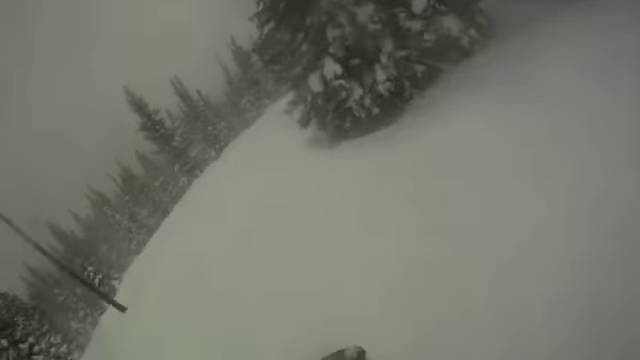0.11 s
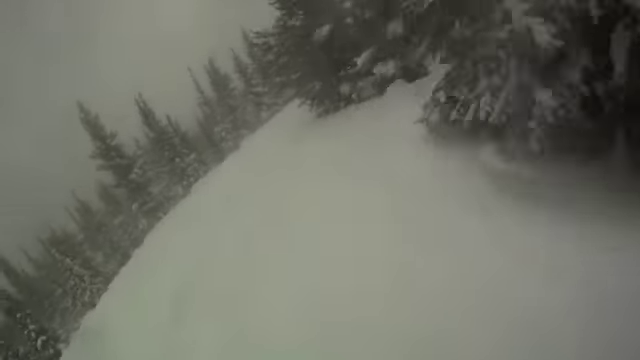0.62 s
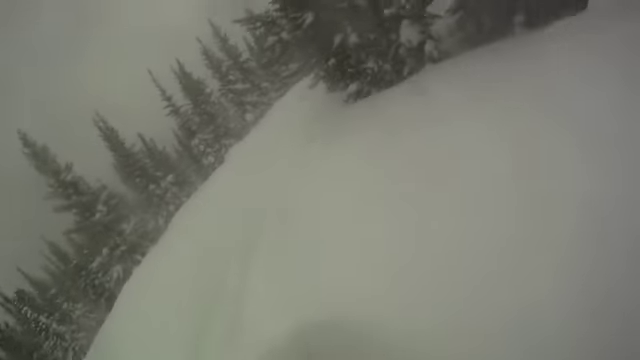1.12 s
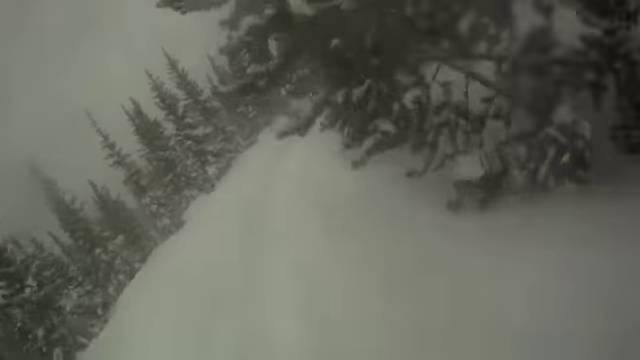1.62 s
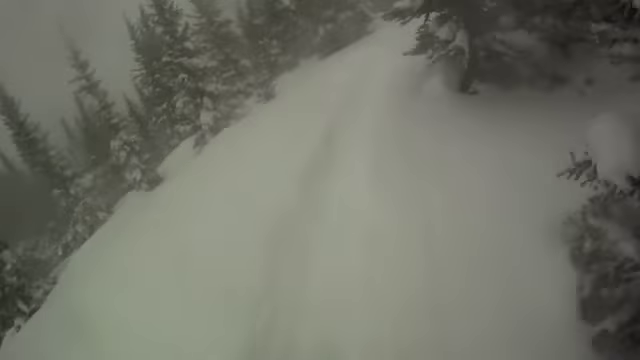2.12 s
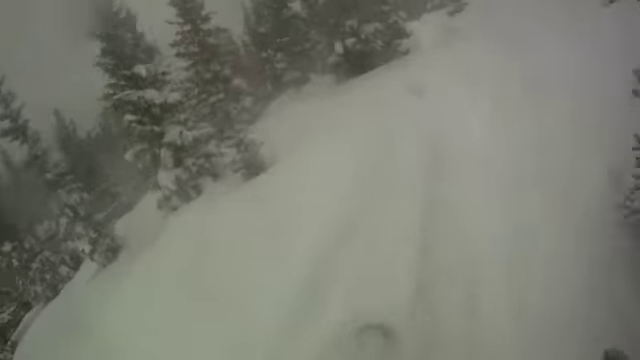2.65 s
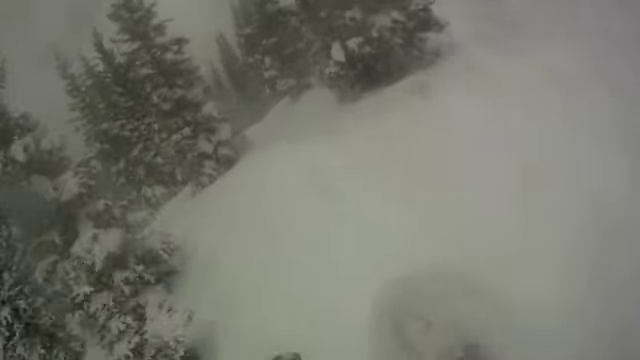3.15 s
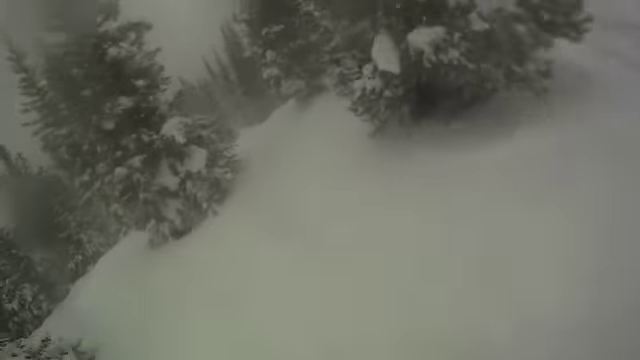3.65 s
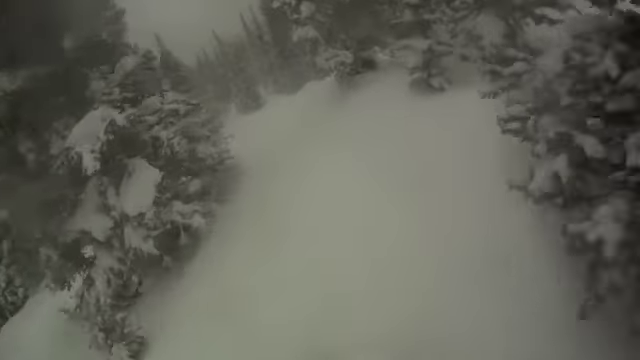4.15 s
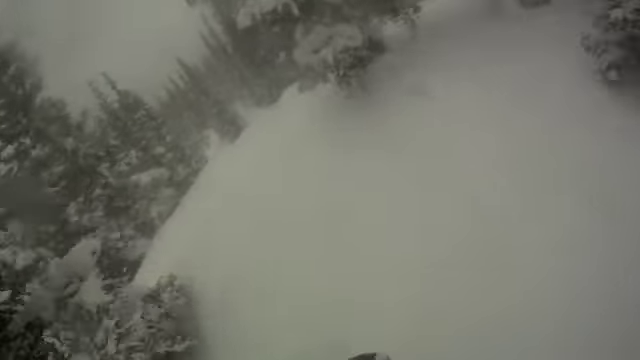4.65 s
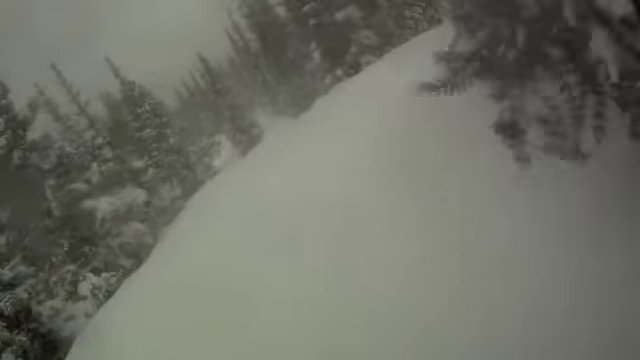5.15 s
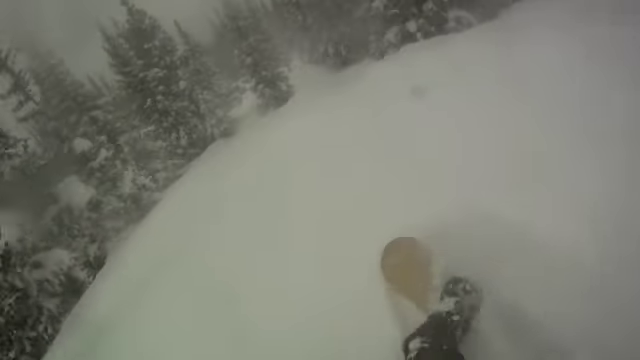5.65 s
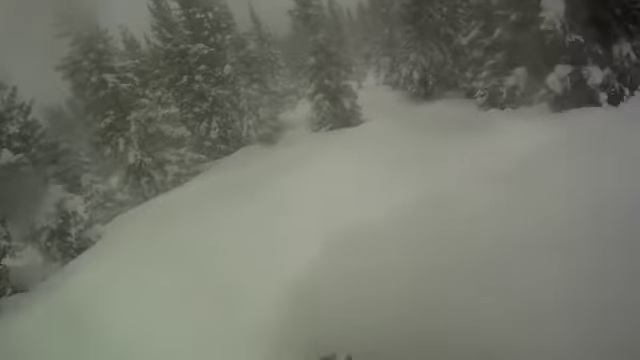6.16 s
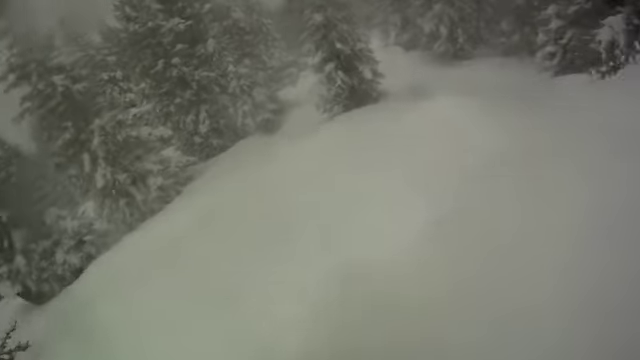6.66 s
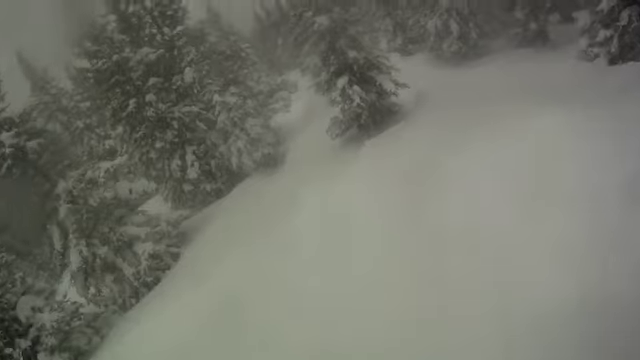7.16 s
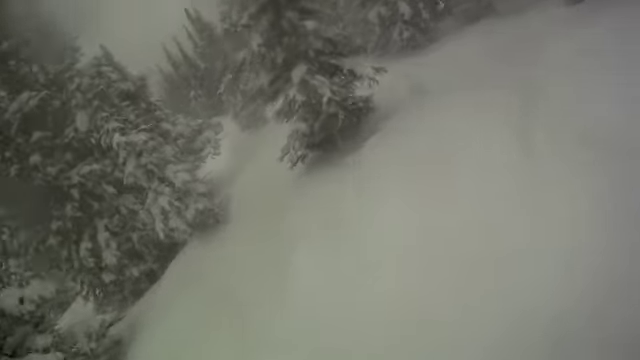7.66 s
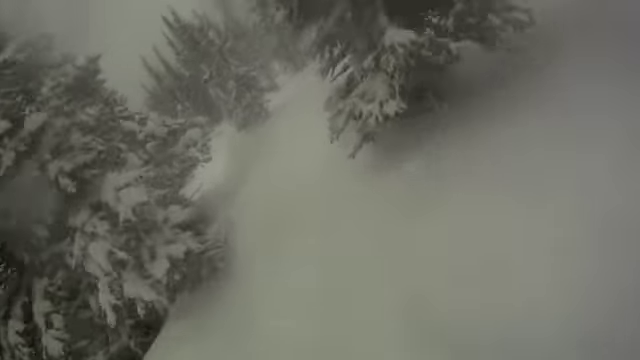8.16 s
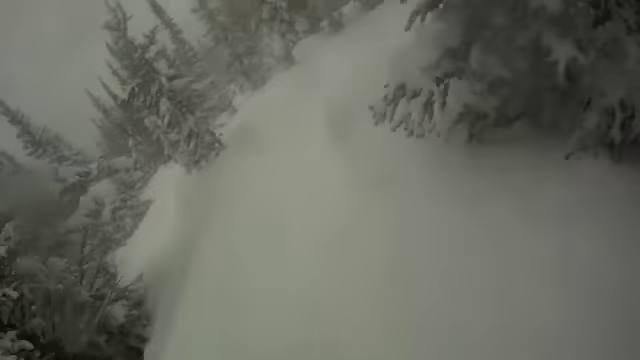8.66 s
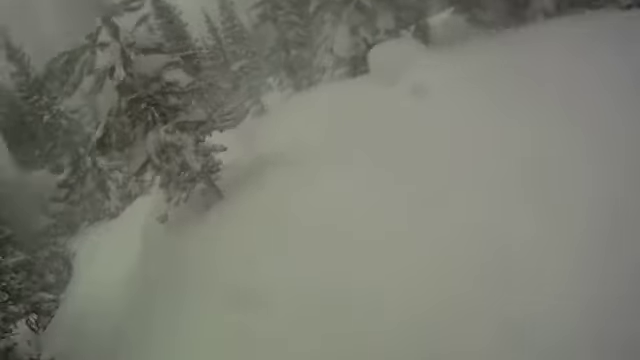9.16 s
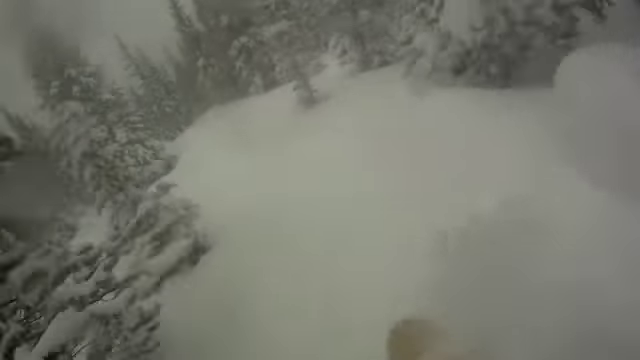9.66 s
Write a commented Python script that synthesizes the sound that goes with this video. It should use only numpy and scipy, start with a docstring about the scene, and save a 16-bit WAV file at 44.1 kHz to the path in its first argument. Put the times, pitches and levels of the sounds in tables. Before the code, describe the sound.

A rider glides through deep powder among snowy trees. Inside a sealed case worn on the body, the microphone hears snow spray as a swelling, boxy hiss with fine patter and icy clicks. Hard little ticks cluster at the start. Near two seconds a twig slaps the case, extremely loud and very short, leaving a brief low hum. Soft mount thumps and low wind buffeting continue, and a deeper carving hiss comes around eight seconds.

```python
"""Powder-snow spray hisses, patters and clicks on a closed case strapped to a gliding rider.
Hiss and flakes are noise through case resonances; crystals and ticks start as short damped tones.
A twig slaps the case: an overloading noise burst, then a hum. Bumps ring the mount's modes.
Wind is coloured noise: a low shake, and a roar with mount hum.
One microphone inside the case feeds both channels."""
import sys
import numpy as np
from scipy import signal
from scipy.fft import rfft, irfft, next_fast_len
from scipy.io import wavfile
from scipy.ndimage import map_coordinates

SR = 44100
rng = np.random.default_rng(int(sys.argv[2]) if len(sys.argv) > 2 else 0)


def makeup_ratio(level_db):
    """Linear amplitude ratio for a level in decibels (20 dB per factor of ten)."""
    decades = np.asarray(level_db, float) / 20
    return 10 ** decades


def waveform_to_disk(signal):
    """Save audio, clipped to [-1, 1], as 16-bit WAV at the path in sys.argv[1]."""
    frames = np.transpose(np.atleast_2d(signal))
    scaled = np.clip(frames, -1, 1) * 32767
    samples = np.round(scaled).astype(np.int16)
    wavfile.write(sys.argv[1], SR, samples)


N = 431738  # samples

# Turbulence round the case. Each row: time in seconds, low shake in relative dB, dull roar in relative dB.
WIND = [(0.0, -54, -52), (0.49, -49.5, -55), (0.71, -48.5, -52), (1.45, -51.5, -60), (2.62, -49.5, -58),
        (3.0, -54, -57), (3.19, -60.5, -58.5), (3.46, -59.5, -62), (3.63, -52, -60.5), (3.98, -55, -58.5),
        (4.39, -53, -57), (5.07, -54, -57), (5.42, -49, -51), (5.64, -50.5, -57), (5.83, -56.5, -58),
        (6.13, -47, -59), (6.41, -54, -61), (6.65, -49, -58), (7.39, -58.5, -62.5), (7.93, -50.5, -62.5),
        (8.31, -49, -57.5), (8.92, -55, -57), (9.3, -48.5, -57.5), (9.79, -59.5, -55.5)]
# Spectrum of the shake. Each row: frequency in Hz, relative gain in dB.
SHAKE_SPECTRUM = [(6, -30.5), (12, 2), (22, -3), (31, -8.5), (48, -4), (60, -12), (80, -22.5), (110, -33.5),
                  (220, -120)]
# Spectrum of the roar. Each row: frequency in Hz, relative gain in dB.
ROAR_SPECTRUM = [(53, -31.5), (90, -4), (118, -1), (150, -0.5), (206, -11), (557, -11), (747, -13),
                 (1000, -20), (1300, -42.5), (2200, -120)]
# Modes of the mount. Each row: frequency in Hz, width in Hz, relative level when bumped in dB.
MOUNT_MODES = [(49.6, 10.7, 20), (116.3, 7.3, -14), (197.4, 24, 7), (552, 45, 18.5)]
# Bumps through the mount. Each row: start in seconds, knock in relative dB,
# sway relative to the knock in dB, shell ring relative to the knock in dB.
BUMPS = [(0.654, -35, 0, -15), (1.44, -47, -4, -17), (2.445, -34, -2, -11), (2.659, -29, -5.5, -9.5),
         (3.042, -45, -4, -24), (5.285, -31.5, -4.5, -12), (6.026, -37, 1.5, -22),
         (7.856, -41.5, -4.5, -11), (9.033, -55, -8.5, -7), (9.167, -37.5, -2, -14)]

# Spectrum of the twig on the case. Each row: frequency in Hz, relative gain in dB.
TWIG_SPECTRUM = [(100, -27.5), (180, -24.5), (330, -11.5), (650, -27), (1000, -10), (1300, -6), (2000, -1),
                 (2500, -3), (3500, 0.5), (5800, -29), (8500, -10), (11200, -24.5), (12200, -39.5),
                 (14600, -13), (16000, -30)]
# Slap: full rattle, weaker rattle as the twig slides off, fade
SLAP_S, RATTLE_S, SLIDE_S = 1.9345, 0.0072, 0.003
RATTLE_DB, SLIDE_DB, FADE_DB_PER_S = 2, -6, 6000
# Strap hum after the slap
HUM_DB, HUM_WAIT_S, HUM_RISE_S, HUM_FADE_S = -43, 0.018, 0.018, 0.17

# Snow clods and twigs ticking on the case. Each row: start in seconds, relative level in dB,
# pitch in Hz, brightness relative to the level in dB.
TICKS = [(0.1151, -22, 3110, -14), (0.1635, -21, 1910, -13), (0.176, -12, 3500, -17),
         (0.1874, -18.5, 2050, -15), (0.2174, -16.5, 1920, -22), (0.2264, -12, 2100, -21),
         (0.4534, -25, 1380, -7.5), (0.5197, -26, 2070, -9), (0.6534, -28, 1800, -28),
         (0.8924, -22, 2610, -10.5), (0.9807, -28, 2190, -11), (0.9901, -20.5, 2110, -12),
         (1.4661, -21.5, 1490, -20), (1.4945, -19, 1960, -20.5), (1.7639, -22.5, 2050, -17.5),
         (2.0941, -19.5, 1900, -14), (2.16, -23, 1750, -15.5), (2.4578, -18, 1700, -19.5),
         (2.5296, -14.5, 2100, -23), (2.6589, -17, 1800, -22), (2.7462, -30, 1900, -18),
         (2.807, -27, 2100, -17.5), (2.8434, -25.5, 1900, -15), (2.9223, -28, 1480, -16),
         (2.9347, -19, 2220, -20), (3.0599, -24.5, 2070, -19.5), (3.1652, -26, 1970, -25.5),
         (3.2735, -23, 2140, -22.5), (3.404, -40, 2010, -14.5), (3.4695, -37.5, 1430, -11.5),
         (3.5336, -28.5, 2090, -17), (3.5803, -34, 2260, -14), (3.6686, -22, 2080, -25),
         (3.711, -23.5, 1690, -24), (3.9644, -22.5, 2210, -21), (3.9888, -20.5, 2100, -20.5),
         (4.0417, -21.5, 2050, -23), (4.6907, -25, 1860, -16), (4.811, -14, 1370, -28),
         (5.0679, -23, 1800, -23), (5.2924, -23.5, 1750, -16), (5.7585, -27, 1850, -17),
         (5.8267, -25, 2150, -19), (6.0247, -22.5, 1830, -19.5), (6.1186, -32, 1770, -11.5),
         (6.296, -30, 1640, -16), (6.5049, -30, 1490, -14), (6.5708, -32, 2150, -13),
         (6.7121, -24.5, 1920, -23.5), (6.7451, -37.5, 1940, -12), (6.8089, -30, 1930, -19),
         (6.9386, -38.5, 1440, -6.5), (6.9691, -39, 1960, -11.5), (7.3908, -33, 2190, -15),
         (7.4709, -39, 1990, -17), (7.5428, -24.5, 2090, -16.5), (7.5777, -22.5, 2010, -18),
         (7.6345, -26, 2130, -22), (7.8271, -17.5, 2520, -17.5), (7.894, -22.5, 1870, -22),
         (7.9818, -30, 3540, -15), (7.9987, -27, 1870, -19), (8.7111, -27, 1430, -20),
         (9.1267, -26, 2310, -21), (9.1666, -20, 1830, -23), (9.409, -25, 2140, -20),
         (9.5532, -21.5, 3600, -15), (9.5711, -25, 1980, -10.5), (9.6719, -27, 2170, -18)]
# The twig grazing the case just before it slaps. One row: start in seconds, relative level in dB,
# pitch in Hz, brightness relative to the level in dB.
FIRST_TOUCH = (1.9245, -24, 2200, -15)
# Smaller ticks in between: centre and scatter
SMALL_DB, SMALL_SCATTER_DB = -37, 3.5
SMALL_HZ, SMALL_LOG_PITCH_SCATTER = 1870, 0.14
SMALL_BRIGHT_DB, SMALL_BRIGHT_SCATTER_DB = -12, 1.5
SMALL_DB_PER_SPRAY_DB = 0.49

# Snow thrown up by the board. Each row: time in seconds, spray in relative dB,
# fine powder fizz in relative dB.
SPRAY = [(0.0, -39, -38.5), (0.24, -43, -47), (0.95, -44.5, -48), (1.36, -50, -53.5), (1.47, -53, -58),
         (1.8, -52.5, -56), (1.91, -48.5, -62.5), (2.1, -55.5, -63.5), (2.53, -44, -53),
         (2.81, -53.5, -59.5), (3.11, -49.5, -57.5), (3.3, -56, -63.5), (3.52, -60, -61),
         (3.68, -50.5, -58.5), (3.84, -49, -57), (4.06, -48, -53.5), (4.39, -50, -57), (4.77, -47, -53.5),
         (5.1, -45, -49.5), (5.4, -45, -51), (5.81, -51.5, -56), (6.11, -51, -57.5), (6.3, -56.5, -61.5),
         (6.68, -54.5, -60.5), (6.9, -61, -64.5), (7.33, -57.5, -65), (7.82, -57.5, -61),
         (7.99, -51.5, -56.5), (8.21, -48, -53.5), (8.34, -44, -49.5), (8.51, -51.5, -55.5),
         (8.83, -53, -64), (9.24, -49.5, -57.5), (9.79, -51.5, -56)]
# Case from inside, low part. Each row: frequency in Hz, relative gain in dB.
CASE_LOW = [(290, -58.5), (500, -17.5), (555, -10), (631, -20.5), (884, -21.5), (1130, -14), (1330, 0),
            (1520, 0), (2090, 0.5), (2780, -11), (3000, -13), (3900, -28), (6600, -120)]
# Case from inside, high part. Each row: frequency in Hz, relative gain in dB.
CASE_HIGH = [(1500, -44.5), (2700, -7), (3500, 4), (4000, -9), (5000, -5.5), (6000, -24), (7000, -9),
             (10600, -8.5), (11400, -38), (12700, -11.5), (13300, -9), (14100, -2.5), (15250, -13.5),
             (16500, -28)]
# Crisp edge of hard ice on the case. Each row: frequency in Hz, relative gain in dB.
ICE_SPECTRUM = [(1800, -27), (3000, 3.5), (3600, -0.5), (5000, -2.5), (6000, -16.5), (7200, -3.5),
                (9800, -7), (12000, -20.5), (14000, -0.5), (16500, -20.5)]
BOARD_EDGE_DB, DUST_DB = 3, -2.5  # over the spray
# One hard turn digs the board's edge in deeper
TURN_S, TURN_LENGTH_S, TURN_RAMP_S, TURN_DB = 7.98, 0.51, 0.025, 4.5

# Ripples from the narrow sound port. Each row: frequency in Hz, gain in dB.
PORT_RESPONSE = [(6900, -1), (7250, -1), (7900, -5.5), (8500, 3.5), (9200, -4), (9900, 4.5), (10400, 0)]
# Treble response: a dip near 12 kHz and the band limit above 15 kHz. Each row: frequency in Hz, gain in dB.
TREBLE_RESPONSE = [(10700, -0.5), (11400, -11), (12700, -7.5), (13300, -7), (15250, -3), (15400, -27),
                   (15800, -29), (16100, -53.5), (16700, -103)]
# Colour of the faint left-right difference. Each row: frequency in Hz, relative gain in dB.
APART_SPECTRUM = [(60, -47), (150, -48), (380, -24.5), (950, -22), (2380, -43.5), (5980, -29), (15000, -34)]


def unit(x):
    """Scale to rms 1."""
    return x / np.sqrt(np.mean(x ** 2) + 1e-20)


def line(rows):
    """Interpolate each column after the time to one value per sample."""
    s, *columns = np.transpose(rows)
    return [np.interp(np.arange(N) / SR, s, column) for column in columns]


def wobble(knots_per_s):
    """Smooth random curve through normally distributed knots."""
    knots = rng.standard_normal(int(N * knots_per_s / SR) + 4)
    return map_coordinates(knots, [np.arange(N) * knots_per_s / SR])


def filtered(x, response):
    """Multiply the spectrum of x by a function of frequency in Hz."""
    m = next_fast_len(N + SR // 2)
    return irfft(rfft(x, m) * response(np.fft.rfftfreq(m, 1 / SR)), m)[..., :N]


def gain_curve(hz, points):
    """Gain at hz, interpolated in dB over log frequency."""
    f, db = np.transpose(points)
    return makeup_ratio(np.interp(np.log(hz + 1), np.log(f + 1), db))


def shaped(x, points):
    """Zero-phase filter from (Hz, dB) points."""
    return filtered(x, lambda hz: gain_curve(hz, points))


def colour(x, points):
    """Minimum-phase filter from (Hz, dB) points, keeping the power of white noise."""
    def response(hz):
        cepstrum = irfft(np.log(gain_curve(hz, points) + 1e-6))
        half = len(cepstrum) // 2
        cepstrum[1:half] *= 2  # fold to the causal side
        cepstrum[half + 1:] = 0
        log_response = rfft(cepstrum)
        return unit(np.abs(np.exp(log_response))) * np.exp(1j * log_response.imag)
    return filtered(x, response)


def ring(x, hz, width_hz):
    """One second-order resonance driven by x."""
    def response(f):
        damping = 1j * f * width_hz
        return damping / (hz * hz - f * f + damping)
    return filtered(x, response)


def bursts(strikes, decay_s):
    """Each strike sets off noise with an exponential decay."""
    puff = np.exp(-np.arange(SR // 50) / (decay_s * SR))
    return signal.fftconvolve(strikes, puff)[:N] * rng.standard_normal(N)


def pings(s, db, hz, cycles):
    """Short damped tones, one per row, with a decay constant in cycles of each tone."""
    t = np.arange(SR // 150) / SR
    decay = np.exp(-t * hz[:, None] / cycles)
    attack = 1 - np.exp(-t / 0.00023)
    tones = makeup_ratio(db)[:, None] * np.sin(2 * np.pi * hz[:, None] * t) * decay * attack
    at = (s * SR).astype(int)[:, None] + np.arange(len(t))
    return np.bincount(at.ravel(), tones.ravel(), N + len(t))[:N]


def wind():
    """Turbulence: a low shake, and a dull roar that keeps the mount's higher modes humming."""
    shake_db, roar_db = line(WIND)
    shake = unit(makeup_ratio(2.1 * wobble(7.5)) * colour(rng.standard_normal(N), SHAKE_SPECTRUM))
    push = makeup_ratio(1.5 * wobble(20)) * rng.standard_normal(N)
    hum = 0
    for (hz, width_hz, _), db in zip(MOUNT_MODES[1:], [-8, -4, -9]):
        hum = hum + makeup_ratio(db + 3.1 * wobble(3.03)) * unit(ring(push, hz, width_hz))
    roar = unit(colour(push, ROAR_SPECTRUM) + makeup_ratio(-3) * hum)
    return makeup_ratio(shake_db + 7.5) * shake + makeup_ratio(roar_db + 1.0) * roar


def bumps():
    """A short inward push knocks the mount and rings its shell; the slower rebound sets it swaying."""
    s, knock_db, sway_db, shell_db = np.transpose(BUMPS)
    out = 0
    for (hz, width_hz, mode_db), part_db in zip(MOUNT_MODES, [sway_db, sway_db, 0, shell_db]):
        rebound = hz == MOUNT_MODES[0][0]
        rise_s = 0.0029 if rebound else 0.0004
        u = np.arange(SR // 20) / (rise_s * SR)
        pulse = u * np.exp(-u)
        size = makeup_ratio(knock_db + part_db + mode_db) * SR / (2 * np.pi * width_hz)
        push = np.zeros(N)
        push[((s + 0.004 * rebound) * SR).astype(int)] = size if rebound else -size
        out = out + ring(signal.fftconvolve(push, pulse / np.sum(pulse))[:N], hz, width_hz)
    return out


def slap():
    """Twig: a noise burst louder than the microphone can take; it leaves the strap humming."""
    t = np.arange(N) / SR - SLAP_S
    fade_db = FADE_DB_PER_S * np.maximum(t - RATTLE_S - SLIDE_S, 0)
    level_db = np.where(t < RATTLE_S, RATTLE_DB, SLIDE_DB) - fade_db
    rattle = (t > 0) * makeup_ratio(level_db) * colour(rng.standard_normal(N), TWIG_SPECTRUM)
    u = np.maximum(t - HUM_WAIT_S, 0)
    swell = (1 - np.exp(-(u / HUM_RISE_S) ** 2)) * np.exp(-(u / HUM_FADE_S) ** 3)
    tone = np.sqrt(2) * np.sin(2 * np.pi * MOUNT_MODES[1][0] * t)
    return rattle + makeup_ratio(HUM_DB) * swell * tone


def small_ticks(count):
    """Rows like those of TICKS at random moments, stronger in thick spray."""
    u, g = rng.random((count, 2)), rng.standard_normal((count, 2))
    s = u[:, 0] * (N - 1) / SR
    at, spray_db, _ = np.transpose(SPRAY)
    follow_db = SMALL_DB_PER_SPRAY_DB * (np.interp(s, at, spray_db) - spray_db.mean())
    db = SMALL_DB + SMALL_SCATTER_DB * (2 * u[:, 1] - 1) + follow_db
    hz = SMALL_HZ * np.exp(SMALL_LOG_PITCH_SCATTER * g[:, 0])
    bright_db = SMALL_BRIGHT_DB + SMALL_BRIGHT_SCATTER_DB * np.tanh(g[:, 1])
    return np.c_[s, db, hz, bright_db]


def ticks():
    """Single hard contacts: a pitched knock, a puff of snow and a bright edge."""
    s, db, hz, bright_db = np.r_[TICKS, [FIRST_TOUCH], small_ticks(count=150)].T
    at = (s * SR).astype(int)
    dull, bright = np.zeros((2, N))
    dull[at] = makeup_ratio(db - 10.0)
    bright[at] = makeup_ratio(db + bright_db + 7.0)
    knock = pings(s, db - 6.5, hz, cycles=6.0)
    puff = colour(bursts(dull, decay_s=0.0017), CASE_LOW)
    edge = colour(bursts(bright, decay_s=0.0017), ICE_SPECTRUM)
    return knock + puff + edge


def patter(rate_hz, spread_db, decay_s):
    """Flakes as random noise bursts, a few much bigger than the rest; rms 1."""
    hits = rng.random(N) < rate_hz / SR
    size_db = spread_db * np.minimum(rng.exponential(size=N), 4)
    return unit(bursts(hits * makeup_ratio(size_db), decay_s))


def crystals(count, centre_hz, spread_db):
    """Ice crystals as clicks on the case, each a damped tone of its own pitch; rms 1."""
    u, g = rng.random((count, 2)), rng.standard_normal(count)
    hz = np.clip(centre_hz * np.exp(0.5 * g), 2000, 15000)
    size_db = spread_db * np.minimum(-np.log(1 - u[:, 1]), 2.4)
    return unit(pings(u[:, 0] * (N - 1) / SR, size_db, hz, cycles=1.3))


def spray():
    """Powder hiss and pattering flakes through the case, and clicking crystals in clumps with an icy colour of
    their own."""
    hiss_db, fine_db = line(SPRAY)
    turn_end_s = TURN_S + TURN_LENGTH_S
    turn_rows = [(TURN_S - TURN_RAMP_S, 0), (TURN_S, 1), (turn_end_s, 1), (turn_end_s + TURN_RAMP_S, 0)]
    turn_db = TURN_DB * line(turn_rows)[0]
    swell = makeup_ratio(1.25 * wobble(25) + 0.69 * wobble(90) + 1.2 * wobble(6))
    grit = makeup_ratio(-0.5 * (fine_db - np.mean(fine_db)))  # dense spray blurs single grains into hiss
    flakes = grit * makeup_ratio(4.27 * wobble(10)) * patter(rate_hz=350, spread_db=3.0, decay_s=0.0011)
    ice = grit * makeup_ratio(2.9 * wobble(7)) * crystals(count=3000, centre_hz=5340, spread_db=10.5)
    low = colour(swell * rng.standard_normal(N) + makeup_ratio(-6.5) * flakes, CASE_LOW)
    high = colour(swell * rng.standard_normal(N) + makeup_ratio(-7) * flakes, CASE_HIGH)
    high = high + makeup_ratio(-13.5) * colour(ice, ICE_SPECTRUM)
    carve = shaped(low, [(1500, 1), (1900, -27)])  # board's edge, deeper than the spray
    fizz = shaped(high, [(5800, -3.5), (6300, -15.5)])
    board_edge = makeup_ratio(hiss_db + BOARD_EDGE_DB + turn_db) * carve
    body = makeup_ratio(hiss_db + 3.0 + 0.53 * turn_db) * (low - carve)
    powder = makeup_ratio(fine_db + 3.5) * fizz
    dust = makeup_ratio(hiss_db + DUST_DB + 0.7 * turn_db) * (high - fizz)
    return board_edge + body + powder + dust


def scene():
    """One microphone feeds both channels; spray and ticks pass the sound port's ripples."""
    through_port = shaped(spray() + ticks(), PORT_RESPONSE)
    return np.tile(through_port + slap() + bumps() + wind(), (2, 1))


def low_pass(x):
    """Removes everything above the highest recorded frequency."""
    return signal.sosfilt(signal.butter(12, 16630, fs=SR, output="sos"), x)


def record(dry):
    """The input clips softly; gain control ducks after an overload and recovers in about 0.1 s."""
    clipped = dry / (1 + np.abs(dry / 0.97) ** 6) ** (1 / 6)
    t = np.arange(SR // 2) / SR
    memory = (1 - np.exp(-(t / 0.014) ** 5)) * np.exp(-(t / 0.06) ** 2)
    excess = np.maximum(np.abs(clipped) - 0.4, 0)
    overload = signal.fftconvolve(excess, memory[None], axes=1)[:, :N]
    ducked = shaped(clipped / (1 + 0.09 * np.abs(overload)), TREBLE_RESPONSE)
    # a faint fluttering copy, opposite in sign left and right
    apart = makeup_ratio(-4.5) * shaped(ducked[0] * wobble(30), APART_SPECTRUM)
    return low_pass(ducked + [apart, -apart])


dry = scene()
out = record(dry)
waveform_to_disk(out)
```